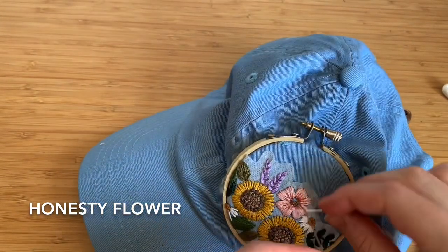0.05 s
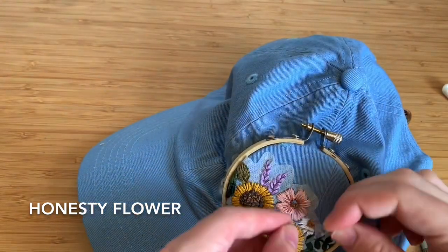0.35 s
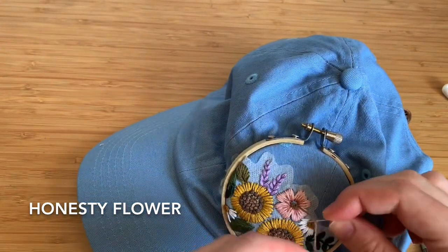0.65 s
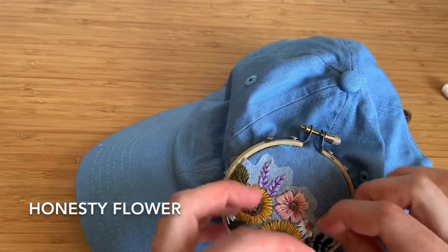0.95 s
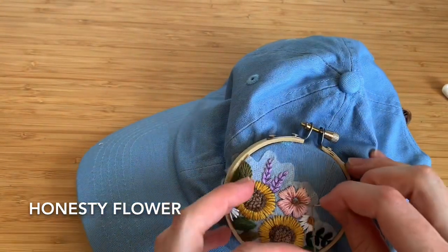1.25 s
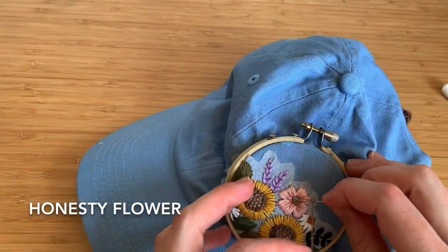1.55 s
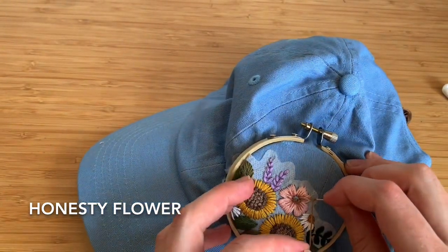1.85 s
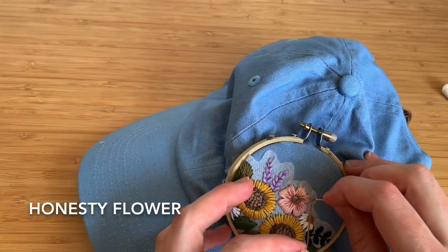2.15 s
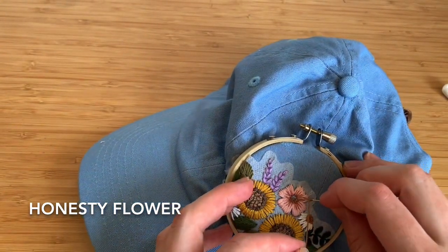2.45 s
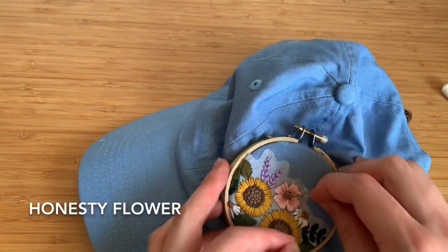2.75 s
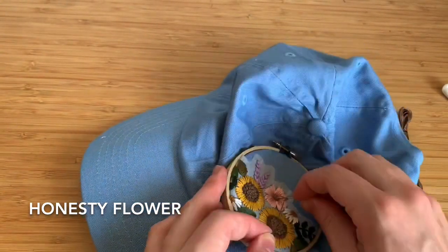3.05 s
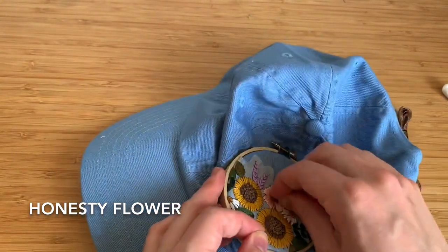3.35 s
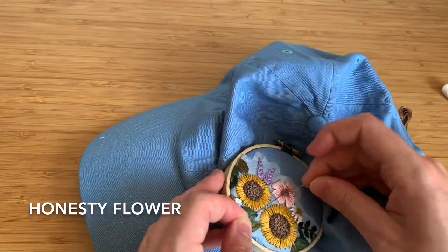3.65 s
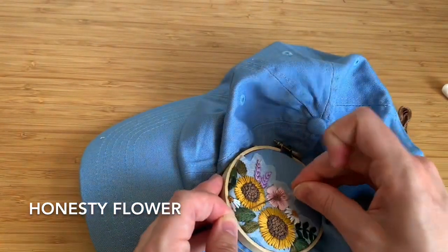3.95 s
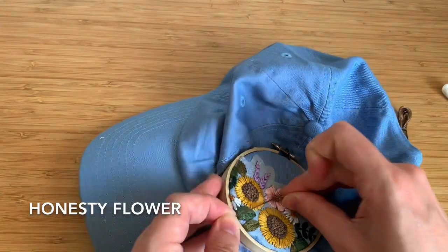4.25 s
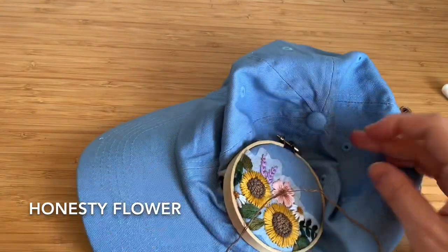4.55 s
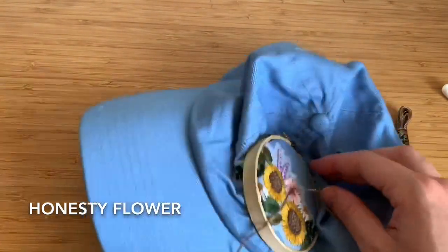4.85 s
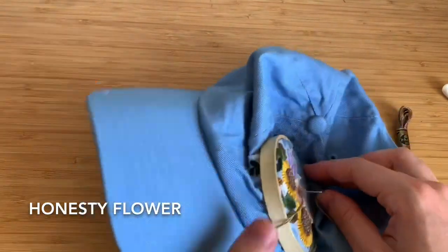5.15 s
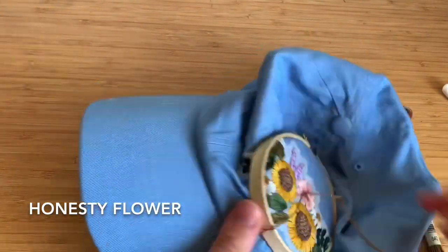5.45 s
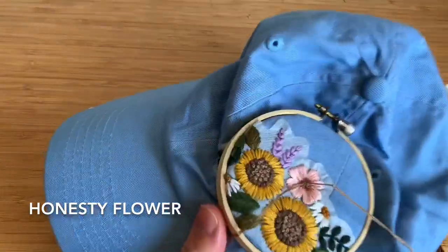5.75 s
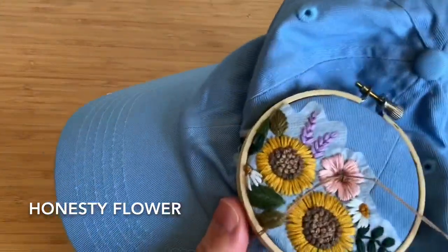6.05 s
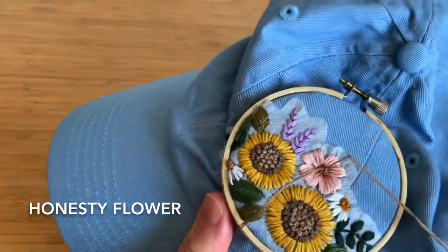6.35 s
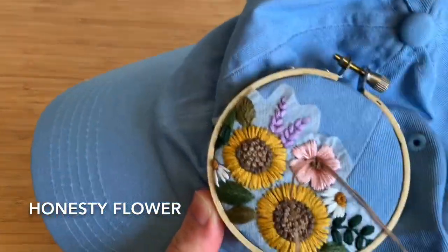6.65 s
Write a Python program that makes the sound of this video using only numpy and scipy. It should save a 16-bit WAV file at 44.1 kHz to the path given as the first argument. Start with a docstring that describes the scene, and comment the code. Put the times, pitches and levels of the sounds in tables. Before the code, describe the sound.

Fingers rub and lightly tap fabric stretched in an embroidery hoop, close to the microphone in a quiet room with a faint hum. About halfway, a needle pops through with a drum-like pluck. Smaller plucks follow, with swishing cloth and short rasps of thread. Near the end the wooden hoop knocks loudly on a table, which booms briefly, and is dragged a little.

```python
"""Hand embroidery on a cap, close to a stereo microphone pair in a quiet room with a faint hum.
Fingers rub softly over the weave and tap the fabric, which is stretched in its hoop like a small drum.
At 3.5 s the needle pops through with a sharp pluck; more plucks follow, the twill swishes, and the
thread rasps through the hole in short pulls. At 6.4 s the wooden hoop is knocked down on the table,
which booms under it, and is dragged a little."""
import sys
import numpy as np
from scipy import signal
from scipy.fft import rfft, irfft, next_fast_len
from scipy.io import wavfile
from scipy.ndimage import uniform_filter1d, map_coordinates

SR = 44100
rng = np.random.default_rng(int(sys.argv[2]) if len(sys.argv) > 2 else 0)


def bounce(signal):
    """Save signal as a 16-bit WAV file at the path given by the first command-line argument."""
    frames = np.transpose(np.atleast_2d(signal))
    limited = np.clip(frames, -1, 1)
    pcm = np.round(limited * 32767).astype(np.int16)
    wavfile.write(sys.argv[1], SR, pcm)


N = 295911

# The wooden hoop's modes. Each row: frequency in Hz, width in Hz, level in dB.
HOOP_MODES = [(341, 150, 5.5), (610, 302, 1.5), (833, 326, -2.5), (1726, 430, -12), (3010, 240, -32.5)]
# The hiss of fine fibres. Each row: frequency in Hz, level in dB.
FIBRE_SPECTRUM = [(800, -21), (2500, 0.5), (4000, 1.5), (6000, -3.5), (9000, -1), (12000, -5), (15500, -3)]
# How alike the two microphones sound. Each row: frequency in Hz, likeness (1 is mono).
STEREO_LIKENESS = [(100, 0.87), (300, 0.67), (700, 0.39), (1400, 0.54), (2200, 0), (16000, 0.048)]


def plucks():
    """Needle and fingers pluck the taut fabric like a damped drum: a snap, a plop and the cap's thud."""
    # Each row: start in seconds, relative level in dB, drum pitch in Hz, relative snap in dB,
    # lean to the left in dB.
    hits = [(0.531, -52, 290, -14, 1), (0.601, -48.5, 272, -4, 2.5), (0.936, -43, 264, -13, 3),
            (3.456, -49.5, 300, 7, 5), (3.5133, -29, 268, -2, 3), (3.983, -37, 317, 0, 3.5),
            (4.103, -47, 317, -3, 5), (4.277, -45, 283, 3.5, 2), (4.525, -55.5, 394, 5, 4),
            (4.537, -44.5, 108, -27, 3.5), (4.645, -48.5, 463, -12, 6), (4.653, -46, 115, -30, 2.5),
            (5.645, -40.5, 107.4, -47.5, 2.5), (5.856, -54, 497, 4, 2), (6.056, -38.5, 330, -15, 2),
            (6.165, -49.5, 300, -22, 2), (6.255, -48.5, 264, -16.5, 1)]
    out = np.zeros((2, N))
    for start, db, hz, snap_db, left_db in hits:
        modes = [(85, 50, -11), (hz, .5 * hz, 0), (3.44 * hz, 1.37 * hz, snap_db - 13.5)]
        pad_hz = 1800 * amp(snap_db / 2)  # a fingertip is softer than the needle
        soften = lambda f: 1 / (1 + 1j * f / pad_hz - (f / pad_hz) ** 2)
        plop = filtered(blow(modes, lag=0.001397), soften)
        add(out, start - .0006, placed(amp(db - 3.0) * in_room(plop, wet_db=-12.5), left_db))
    return out


def thread_pulls():
    """Tight thread zips through the hole in quick, uneven slips; each slip rings the stretched fabric."""
    # Each row: start in seconds, length in seconds, relative level in dB, slips per second, brightness
    # in dB, mode pitch factor (the fabric's tension), mode width factor (the fingers' damping).
    pulls = [(1.068, 0.03, -69.5, 310, -11, 1.14, 3.6), (2.718, 0.02, -61.5, 260, 0, 0.75, 2.7),
             (4.159, 0.019, -55, 970, -12, 0.87, 2.6), (4.772, 0.061, -47, 1390, -7, 0.99, 1.5),
             (4.826, 0.023, -51.5, 1060, -14, 0.86, 1.7), (5.463, 0.061, -40.5, 1250, -2.5, 1.0, 0.94),
             (5.764, 0.034, -57, 440, 9.5, 0.82, 2.3)]
    # Each row: frequency in Hz and width in Hz before a pull scales them, level in dB.
    fabric_modes = [(564, 560, -4), (1112, 99, 8.5), (1393, 172, 5), (1890, 580, -1), (2550, 470, 0.5),
                    (3160, 200, -0.5), (4000, 1300, -12), (6470, 4400, -32)]
    out, t = np.zeros((2, N)), np.arange(SR // 4) / SR
    for start, length, db, rate, bright_db, tension, damping in pulls:
        speed = rate * amp(10 * uniform_filter1d(rng.standard_normal(len(t)), size=120))
        slips = np.diff(np.floor(np.cumsum(speed) / SR), prepend=-1)
        slips *= amp(3.1 * rng.standard_normal(len(t)))
        # Each microphone faces its own part of the cloth.
        friction = unit(slips) + 0.98 * rng.standard_normal((2, len(t)))
        modes = [(hz * tension, width * damping, level) for hz, width, level in fabric_modes]
        tilt = lambda f: amp(along([(1500, 0), (2500, bright_db)], f))
        rasp = unit(filtered(friction, lambda f: resonances(modes, f) * tilt(f)))
        add(out, start, amp(db - 5.0) * in_room(rasp * stroke(t, length, edge=0.0043), wet_db=-8.0))
    return placed(out, left_db=2.0)


def needle_pricks():
    """A tiny bright tick as the needle's point parts the threads."""
    # Each row: start in seconds, level in dB.
    pricks = [(1.618, -68), (3.5115, -58), (3.949, -60), (4.635, -62)]
    out, t = np.zeros((2, N)), np.arange(SR // 50) / SR
    for start, db in pricks:
        tick = unit(filtered(rng.standard_normal(len(t)), lambda f: f * amp(along(FIBRE_SPECTRUM, f))))
        add(out, start, amp(db) * in_room(tick * amp(-60 * t / 0.011), wet_db=-11))
    return out


def scratches():
    """The needle's tip or a fingernail skids over a few threads with a short pitched zip."""
    # Each row: start in seconds, length in seconds, level in dB, ring in Hz.
    skids = [(0.879, 0.0085, -69, 2150), (0.898, 0.0085, -76, 2060), (2.92, 0.016, -61.5, 1110),
             (2.922, 0.014, -75, 2340), (3.225, 0.063, -65.5, 1200), (3.453, 0.008, -72, 2050),
             (4.159, 0.0084, -67.5, 2720)]
    width_hz = 600
    out, t = np.zeros((2, N)), np.arange(SR // 8) / SR
    for start, length, db, hz in skids:
        skid = unit(filtered(rng.standard_normal(len(t)), lambda f: resonances([(hz, width_hz, 0)], f)))
        add(out, start, amp(db) * in_room(skid * stroke(t, length, edge=0.0018), wet_db=-7.0))
    return placed(out, left_db=6.0)


def hoop_knock():
    """The hoop, padded by the cap, lands on the wooden table and settles; the table top booms."""
    # Each row: start in seconds, level in dB.
    landings = [(6.421, -8.5), (6.4506, -39), (6.464, -40)]
    # Each row: frequency in Hz, width in Hz, level in dB.
    table_modes = [(53.5, 6.9, -8), (80.4, 36, -9), (107, 38, -0.5), (173, 81, -12.5)]
    out = np.zeros((2, N))
    hit = blow(HOOP_MODES, lag=0.000734)
    t = np.arange(len(hit)) / SR
    for start, db in landings:
        scuff = amp(-48.5 - 60 * t / 0.057) * rng.standard_normal(len(t))  # cloth crushed under the rim
        add(out, start, amp(db) * in_room(hit + scuff, wet_db=-16.0))
    boom = blow(table_modes, lag=0.001)
    add(out, 6.42, amp(-21.5) * in_room(boom, wet_db=-19.0))
    return placed(out, left_db=3.5)


def hoop_scrapes():
    """The rim drags over cap and table; friction sets the hoop humming, brighter than a blow does."""
    # Each row: start in seconds, length in seconds, relative level in dB, treble in dB.
    scrapes = [(6.145, 0.022, -65, 12.5), (6.333, 0.015, -65, 22), (6.386, 0.04, -53.5, 11.5),
               (6.572, 0.099, -63.5, 11.5)]
    out, t = np.zeros((2, N)), np.arange(SR // 4) / SR
    for start, length, db, treble_db in scrapes:
        wood = lambda f: resonances(HOOP_MODES, f) * amp(along([(700, -4.0), (2000, treble_db)], f))
        scrape = unit(filtered(rng.standard_normal(len(t)), wood))
        add(out, start, amp(db - 1.5) * in_room(scrape * stroke(t, length, edge=0.0028), wet_db=-7.5))
    return placed(out, left_db=5.0)


def rubbing():
    """Skin, cloth and thread drag over the weave: each stroke is a grainy rub with a fine hiss."""
    # Each row: start in seconds, length in seconds, rub level in dB, hiss level in dB.
    strokes = [(0.015, 0.06, -78, -81), (0.685, 0.038, -77.5, -75.5), (0.725, 0.044, -72.5, -92),
               (0.78, 0.078, -84, -75.5), (0.845, 0.048, -67, -70.5), (0.96, 0.066, -75, -73.5),
               (1.045, 0.044, -75, -86), (2.2, .3, -81, -99), (2.52, 0.065, -77, -77),
               (2.59, 0.19, -70.5, -78), (2.722, 0.074, -65.5, -71.5), (2.8, 0.079, -60.5, -73),
               (2.9, 0.026, -64, -71), (2.98, .13, -64, -78.5), (3.17, 0.043, -64.5, -78),
               (3.21, 0.067, -57.5, -68), (3.37, 0.17, -69.5, -79), (3.68, 0.19, -76.5, -81.5),
               (3.835, 0.052, -68.5, -86), (3.915, 0.072, -68.5, -76.5), (4.16, 0.13, -63, -74),
               (4.26, 0.055, -63.5, -63.5), (4.33, 0.033, -58.5, -70), (4.39, 0.086, -74, -73),
               (4.522, 0.013, -68.5, -74.5), (4.56, 0.094, -80.5, -79.5), (4.63, 0.036, -60.5, -65),
               (4.66, 0.056, -59.5, -66), (4.71, 0.069, -61.5, -59.5), (4.815, 0.036, -63, -55.5),
               (4.87, 0.14, -69, -71), (5.02, 0.093, -71, -65.5), (5.13, 0.13, -65.5, -73.5),
               (5.215, 0.05, -59.5, -66), (5.27, 0.056, -58.5, -61.5), (5.35, 0.17, -62, -67.5),
               (5.46, 0.077, -53, -70), (5.55, 0.06, -64, -76), (5.635, 0.18, -72, -71.5),
               (5.875, 0.07, -93, -78), (6.048, 0.019, -68, -73.5), (6.135, 0.026, -77, -69),
               (6.24, 0.092, -76, -80), (6.31, 0.12, -72, -73), (6.41, 0.036, -46.5, -57.5),
               (6.575, 0.19, -62, -69.5)]
    # Each row: frequency in Hz, level in dB.
    rub_spectrum = [(100, -47), (330, -0.5), (500, -1.5), (650, -1), (950, 0), (1350, -5), (1950, -11.5),
                    (2600, -14), (4000, -33), (8000, -48), (16000, -47)]
    resting_rub_db, resting_hiss_db = -88.5, -88  # the hands never lie quite still
    rub_gain, hiss_gain = gestures(strokes, attack=0.014, release=0.031)
    grip = amp(0.36 * wobble(rate=63))  # the grip wavers
    coarse_grain = patchy(catches(rate=380, scatter_db=3.0, smooth_db=8.5), depth_db=5.0)
    rub = near_walls(spread(coarse_grain, rub_spectrum), echo_db=-12.5)
    rub *= np.hypot(rub_gain, amp(resting_rub_db))
    fine_grain = patchy(catches(rate=1200, scatter_db=3.0, smooth_db=9.0), depth_db=5.0)
    hiss = spread(fine_grain, FIBRE_SPECTRUM) * np.hypot(hiss_gain, amp(resting_hiss_db))
    return grip * (placed(rub, left_db=2.5) + placed(hiss, left_db=-1))


def twill_swishes():
    """Twill slides over itself as the hoop is lifted and tilted: a longer, brighter rustle than skin's."""
    # Each row: start in seconds, length in seconds, level in dB.
    swishes = [(0.96, 0.043, -78), (4.27, .22, -67), (4.68, 0.24, -67.5), (4.9, 0.11, -71.5),
               (5.02, 0.11, -70), (5.22, 0.33, -60.5), (5.58, 0.2, -67)]
    # Each row: frequency in Hz, level in dB.
    twill_spectrum = [(500, -18), (1200, 2), (2200, -3), (3300, -6.5), (4500, -9.5), (8000, -30.5),
                      (16000, -26)]
    gain, = gestures(swishes, attack=0.046, release=0.021)
    grain = patchy(catches(rate=750, scatter_db=3.0, smooth_db=5.0), depth_db=8.0)
    return near_walls(spread(grain, twill_spectrum), echo_db=-8.0) * gain


def low_judders():
    """Low juddering murmurs: a fingertip on the taut fabric, and near the end the hoop groaning
    as it drags on the table."""
    # Each row: start in seconds, length in seconds, level in dB.
    drags = [(0.035, 0.065, -70), (0.305, 0.048, -74), (0.505, 0.036, -68.5), (0.56, 0.099, -77),
             (1.615, 0.1, -79), (2.61, 0.037, -65.5), (3.05, 0.071, -68.5), (3.21, 0.034, -65),
             (3.708, 0.017, -69.5), (3.775, 0.03, -73), (3.85, 0.092, -69.5), (3.99, 0.029, -70),
             (6.383, 0.051, -51), (6.58, 0.037, -57)]
    # Each row: frequency in Hz, width in Hz, level in dB.
    murmur_modes = [(291, 176, 2), (915, 264, -8.5)]
    gain, = gestures(drags, attack=0.0099, release=0.018)
    judder = catches(rate=620, scatter_db=-0.5, smooth_db=-1.5)[0]
    murmur = unit(filtered(judder, lambda f: resonances(murmur_modes, f)))
    return placed(in_room(murmur * gain, wet_db=-6)[:, :N], left_db=2.0)


def cap_shifts():
    """Cap and hoop give a dull rumble as they are shifted on the table."""
    # Each row: start in seconds, length in seconds, level in dB.
    shifts = [(0.03, 0.081, -74), (0.34, .04, -79), (0.51, 0.041, -79), (0.92, 0.046, -59),
              (2.57, 0.2, -64.5), (2.77, 0.17, -61), (3.19, 0.13, -60.5), (3.4, 0.11, -63.5),
              (3.51, 0.1, -58.5), (3.96, 0.052, -58), (4.26, 0.1, -67), (4.65, 0.34, -69.5),
              (5.22, 0.47, -66), (5.6, 0.18, -59.5), (6.05, 0.021, -54.5), (6.16, 0.015, -55),
              (6.24, 0.21, -60.5), (6.42, 0.14, -49.5), (6.58, 0.18, -47.5)]
    # Each row: frequency in Hz, level in dB.
    rumble_spectrum = [(20, -31), (50, 4), (85, 0), (130, 2), (220, -9), (350, -8.5), (700, -27),
                       (2000, -48)]
    gain, = gestures(shifts, attack=0.015, release=0.037)
    rumble = spread(patchy(rng.standard_normal((2, N)), depth_db=3.0), rumble_spectrum)
    return placed(rumble * gain, left_db=1.0)


def fibre_brushes():
    """Dry skin flicks over loose fibres, which whisper in the high treble."""
    # Each row: start in seconds, length in seconds, relative level in dB.
    flicks = [(0.951, 0.088, -76.5), (2.524, 0.046, -74.5), (2.589, 0.032, -74.5), (2.712, 0.12, -81),
              (5.503, 0.011, -58)]
    out, t = np.zeros((2, N)), np.arange(SR // 4) / SR
    for start, length, db in flicks:
        whisper = unit(filtered(rng.standard_normal(len(t)), lambda f: resonances([(11000, 5700, 0)], f)))
        add(out, start, amp(db - 4) * in_room(whisper * stroke(t, length, edge=0.0037), wet_db=2.5))
    return out


def room_tone():
    """Still air and a slightly unsteady hum."""
    # Each row of both: frequency in Hz, level in dB.
    hum_tones = [(64.6, -77.5), (119, -79)]
    air_spectrum = [(20, -19), (40, -7), (65, 4.5), (120, -4), (170, -9.5), (300, -16), (600, -26),
                    (1200, -33), (2000, -31), (5000, -38), (11000, -35.5), (15500, -41)]
    hum, t = np.zeros(N), np.arange(N) / SR
    for hz, db in hum_tones:
        peak = np.sqrt(2) * amp(db + 2.1 * wobble(rate=8.6))
        hum += peak * np.sin(2 * np.pi * hz * t + 0.69 * wobble(rate=1.8))
    air = amp(-69.0) * spread(rng.standard_normal((2, N)), air_spectrum)
    return placed(air + hum, left_db=1.0)


def blow(modes, lag):
    """A padded blow, peak 1; bending waves bring the treble first, the bass later (lag: s at 1 kHz)."""
    f = np.fft.rfftfreq(SR // 2, 1 / SR)
    travel = np.exp(-4j * np.pi * lag * np.sqrt(1000 * f))
    ring = irfft(resonances(modes, f) * travel)[:SR // 4]
    return ring / np.abs(ring).max()


def resonances(modes, f):
    """Response of (Hz, width, dB) modes; each acts twice, so it swells before it rings."""
    return sum((-1) ** k * amp(db) * (1j * f * width / (hz * hz - f * f + 1j * f * width)) ** 2
               for k, (hz, width, db) in enumerate(modes))


def catches(rate, scatter_db, smooth_db):
    """Surfaces catch and let go: tiny random impulses over smooth sliding noise."""
    sizes = (rng.random(N) < rate / SR) * amp(scatter_db * rng.standard_normal(N))
    return unit(sizes * rng.standard_normal((2, N))) + amp(smooth_db) * rng.standard_normal((2, N))


def patchy(pair, depth_db):
    """The colour of a rub shifts broadly, by at most depth_db, as the contact wanders over folds."""
    bands = signal.stft(pair, nperseg=512)[2]
    colour = uniform_filter1d(rng.standard_normal(bands.shape[1:]), size=8, axis=0)
    colour = uniform_filter1d(colour, size=7, axis=1)
    return signal.istft(bands * amp(depth_db * np.tanh(unit(colour))), nperseg=512)[1][:, :N]


def stroke(t, length, edge):
    """The envelope of one short rub: it rises, holds and falls away (length and edge in seconds)."""
    return (1 - np.exp(-t / edge)) * np.exp(-np.maximum(t - length, 0) / edge)


def gestures(rows, attack, release):
    """Envelopes of (start, length, dB, ..) movements, one per level column; overlaps add in power."""
    power, t = np.zeros((len(rows[0]) - 2, N)), np.arange(SR) / SR
    rise = np.sin(np.pi / 2 * np.minimum(t / attack, 1)) ** 2
    for start, length, *levels_db in rows:
        shape = rise * np.exp(-np.maximum(t - length, 0) / release)
        add(power, start, (amp(levels_db)[:, None] * shape) ** 2)
    return np.sqrt(power)


def near_walls(x, echo_db):
    """Table top and walls return a few weak copies, different at each microphone."""
    delays = rng.uniform(0.002056, .03, size=(8, 2, 1))
    response = lambda f: 1 + amp(echo_db) * np.exp(-2j * np.pi * f * delays).sum(axis=0) * f / (f + 500)
    return unit(filtered(x, response))


def in_room(sound, wet_db):
    """A sound followed by its own diffuse room tail, in stereo."""
    # Each row: frequency in Hz, seconds to die away by 60 dB.
    decay_times = [(80, 0.35), (400, 0.15), (800, 0.33), (2000, 0.23), (10000, 0.089)]
    hz, t, bands = signal.stft(rng.standard_normal((2, SR // 2)), SR, nperseg=256)
    bands = bands * amp(-60 * t / along(decay_times, hz)[:, None]) * (1 - np.exp(-t / 0.00098))
    mid, side = signal.istft(bands * mid_side_gains(hz)[..., None], SR, nperseg=256)[1]
    tail = np.array([mid + side, mid - side])
    echo = amp(wet_db) * tail / np.linalg.norm(tail[0])
    echo[:, 0] += 1  # the direct sound
    return signal.fftconvolve(np.atleast_2d(sound), echo, axes=1)


def spread(pair, spectrum):
    """Two unrelated signals become coloured stereo of rms 1, near mono in the bass."""
    mid, side = filtered(pair, lambda hz: amp(along(spectrum, hz)) * mid_side_gains(hz))
    return unit(np.array([mid + side, mid - side]))


def mid_side_gains(hz):
    """The balance of mid and side that sets the stereo width at each frequency."""
    angle = np.arccos(np.clip(along(STEREO_LIKENESS, hz), -1, 1)) / 2
    return np.array([np.cos(angle), np.sin(angle)])


def placed(x, left_db):
    """Lean a sound to the left."""
    return x * amp([[left_db / 2], [-left_db / 2]])


def add(track, start, sound):
    """Mix a sound into a track at start seconds."""
    part = track[..., round(start * SR):][..., :sound.shape[-1]]
    part += sound[..., :part.shape[-1]]


def filtered(x, response):
    """Shape x by a complex response of frequency."""
    n = x.shape[-1]
    padded = next_fast_len(n + SR // 2)
    return irfft(rfft(x, padded) * response(np.fft.rfftfreq(padded, 1 / SR)), padded)[..., :n]


def wobble(rate):
    """A smooth random curve, rate knots a second."""
    return map_coordinates(rng.standard_normal(int(N * rate / SR) + 4), [np.arange(N) * rate / SR])


def along(points, hz):
    """Read (Hz, value) points on a log axis."""
    freqs, values = np.transpose(points)
    return np.interp(np.log(hz + 1), np.log(freqs + 1), values)


def amp(db):
    """Decibels to gain."""
    return 10 ** (np.asarray(db) / 20)


def unit(x):
    """Scale to rms 1."""
    return x / np.sqrt(np.mean(x ** 2) + 1e-20)


def scene():
    """Handling, stitching and hoop at the work table, over the room tone."""
    handling = rubbing() + twill_swishes() + low_judders() + cap_shifts() + fibre_brushes()
    stitching = plucks() + needle_pricks() + scratches() + thread_pulls()
    hoop = hoop_scrapes() + hoop_knock()
    return handling + stitching + hoop + room_tone()


def record(dry):
    """The microphone pair trades treble between sum and difference; nothing passes the band limit."""
    # Each row: frequency in Hz, lean towards in phase (positive) or out of phase (negative).
    phase_lean = [(4200, -0.007), (5300, -0.17), (6700, 0.54), (8550, -1.34), (9700, -0.11), (11000, 1.07),
                  (12200, -0.04), (13400, -1.27), (15200, 0.071)]
    top_hz = 15800
    swing = lambda hz: np.clip(along(phase_lean, hz), -.99, .99)
    mid_side = np.array([dry[0] + dry[1], dry[0] - dry[1]]) / 2
    mid, side = filtered(mid_side, lambda hz: np.sqrt([1 + swing(hz), 1 - swing(hz)]) * (hz < top_hz))
    return np.array([mid + side, mid - side])


dry = scene()
out = record(dry)
bounce(out)
```